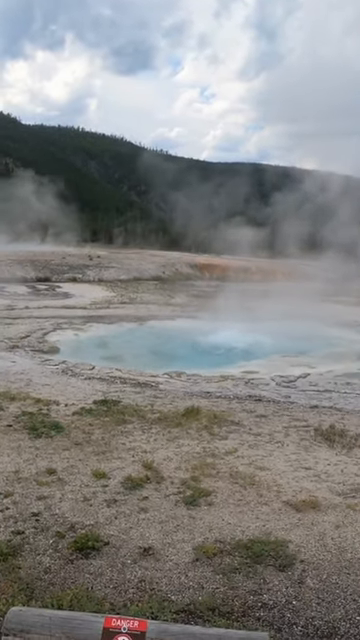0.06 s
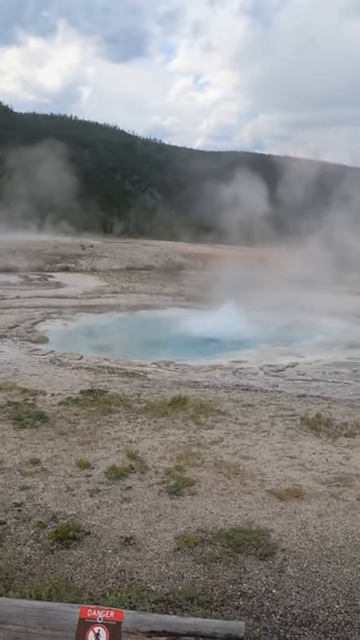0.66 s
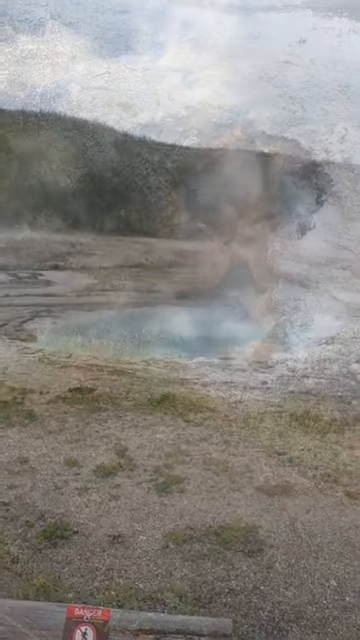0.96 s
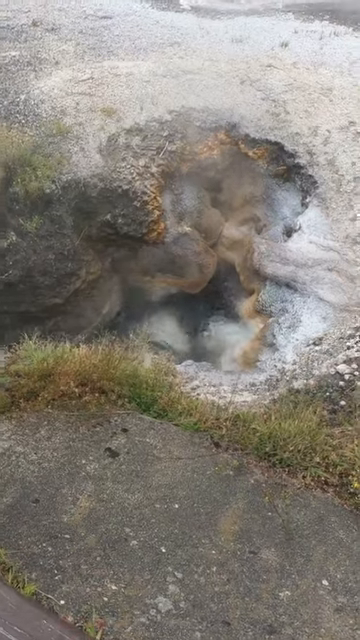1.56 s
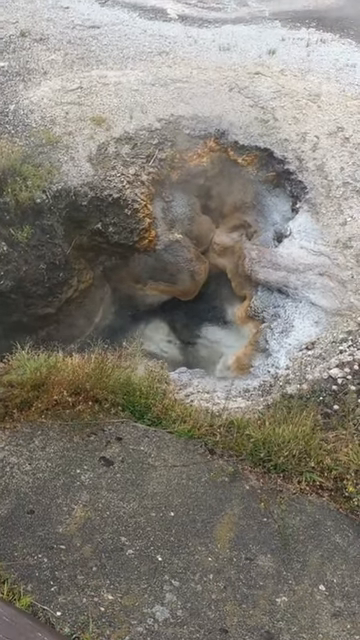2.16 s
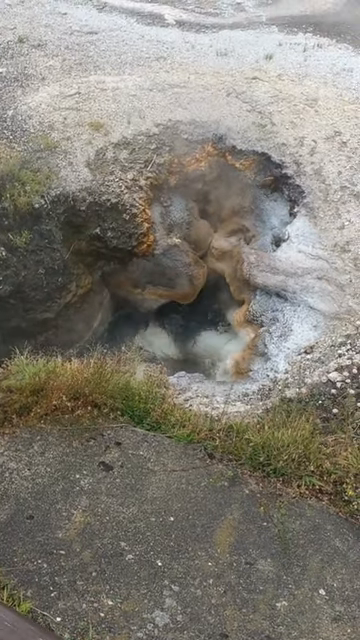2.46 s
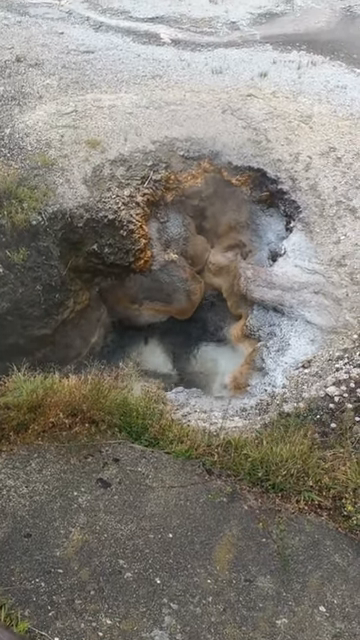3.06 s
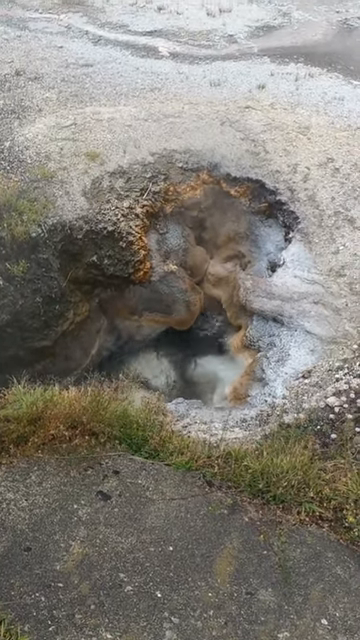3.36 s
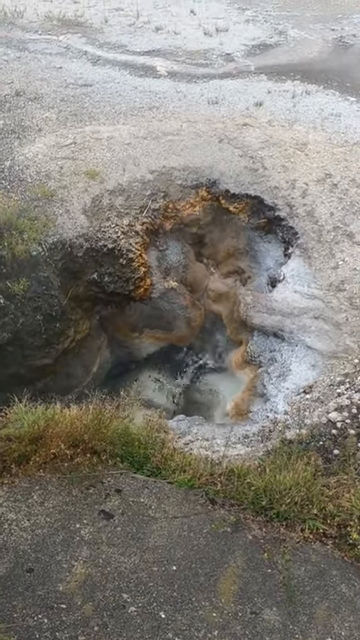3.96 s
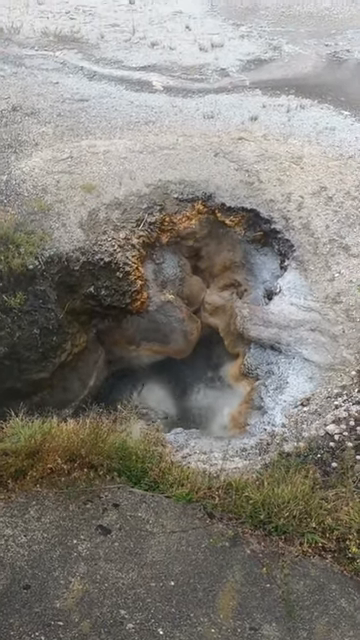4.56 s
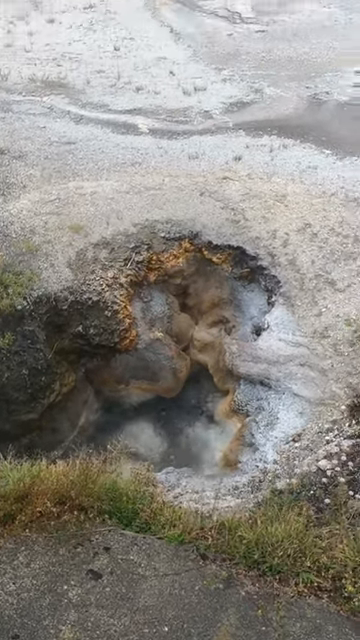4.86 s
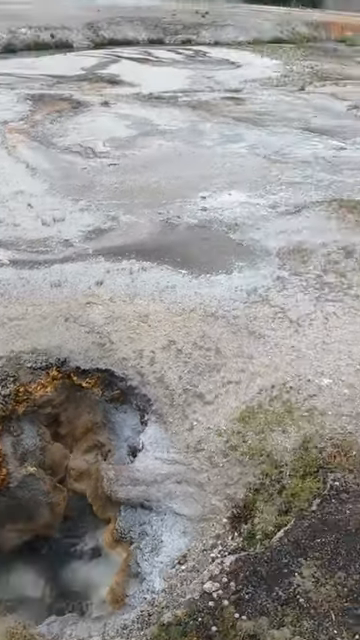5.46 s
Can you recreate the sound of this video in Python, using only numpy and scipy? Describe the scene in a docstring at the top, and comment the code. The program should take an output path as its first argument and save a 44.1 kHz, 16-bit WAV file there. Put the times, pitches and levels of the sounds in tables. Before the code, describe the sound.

A distant boiling pool gives way to a close hot spring bubbling, thumping and spattering on rock, under gusts of wind.

```python
"""A hot spring churns in a small rocky vent close by: large bubbles roll under low gulps and thumps,
small ones ring and snap, and water slops on the rock and throws a fizz of spray and droplets.
A wide pool boiling some way off opens the scene and gives way to the vent. Wind rumbles on the
microphone, a faint low hum lies underneath, and the sound opens from mono to stereo late on."""
import sys
import numpy as np
from scipy import signal
from scipy.fft import rfft, irfft, next_fast_len
from scipy.io import wavfile
from scipy.ndimage import uniform_filter1d

SR = 44100
rng = np.random.default_rng(int(sys.argv[2]) if len(sys.argv) > 2 else 0)


def generate_wav(sig):
    """Save sig (samples, or channels by samples) to the path in sys.argv[1] as 16-bit PCM at SR."""
    pcm = np.round(np.clip(np.atleast_2d(sig).T, -1, 1) * 32767).astype(np.int16)
    wavfile.write(sys.argv[1], SR, pcm)


N = 247401
TIME = np.arange(N) / SR
FFT_SIZE = next_fast_len(N + 8192)
BIN_HZ = np.fft.rfftfreq(FFT_SIZE, 1 / SR)
LEAVE_S, ARRIVE_S = 0.63, 1.45  # the move from the pool to the vent
NEARNESS = np.clip((TIME - LEAVE_S) / (ARRIVE_S - LEAVE_S), 0, 1)

# How hard the vent boils. Each row: time in seconds, level in dB.
BOIL_LEVEL = [(1.2, -38), (1.65, -32), (2.15, -34.5), (3.2, -32.5), (4.15, -32.5), (4.75, -38.5),
              (5.1, -38.5), (5.61, -36.5)]
# The bright tone of flying spray. Each row: frequency in Hz, gain in dB.
SPRAY_SPECTRUM = [(1500, -9), (3200, 7), (4200, 3), (5000, -4), (6200, -5.5), (8000, -14.5), (10500, -22.5),
                  (12500, -22.5), (14500, -44)]
# The opening of the stereo image. Each row: time in seconds, stereo share from 0 to 1.
STEREO_WIDTH = [(3.37, 0), (3.65, 0.16), (4.1, 0.32), (4.4, 0.4)]


def gain_of(db):
    """Decibels to amplitude."""
    return 10 ** (np.asarray(db) / 20)


def unit_rms(x):
    """Scales a sound to rms 1."""
    return x / np.sqrt(np.mean(x ** 2) + 1e-20)


def over_time(rows):
    """Draws a curve through (seconds, value) points, sample by sample."""
    return np.interp(TIME, *np.transpose(rows))


def over_bins(rows):
    """Spreads each column of a spectrum over the FFT bins, on a log frequency scale."""
    hz, *columns = np.transpose(rows)
    return [np.interp(np.log(BIN_HZ + 1), np.log(hz), column) for column in columns]


def filtered(x, response):
    """Applies a frequency response."""
    return irfft(rfft(x, FFT_SIZE) * response, FFT_SIZE)[:N]


def coloured(x, spectrum):
    """Gives a white sound a spectrum, at rms 1."""
    return unit_rms(filtered(x, gain_of(over_bins(spectrum)[0])))


def wander(rate_hz):
    """A smooth random drift of rms 1."""
    return unit_rms(filtered(rng.standard_normal(N), np.exp(-(BIN_HZ / rate_hz) ** 2)))


def hump(middle_s, half_s):
    """A bell-shaped swell that peaks at 1."""
    return np.exp(-0.5 * ((TIME - middle_s) / half_s) ** 2)


def add(mix, start_s, sound):
    """Mixes a sound in at a time."""
    part = mix[max(round(start_s * SR), 0):][:len(sound)]
    part += sound[:len(part)]


def bubble(hz, swell_s, rise):
    """A gas pocket rings and dies, climbing `rise` octaves per swell time as it nears the surface."""
    age = np.arange(int(10 * swell_s * SR) + 2) / (swell_s * SR)
    pitch = hz * 2 ** (rise * (age - 2))
    return age * np.exp(1 - age) * np.sin(2 * np.pi * np.cumsum(pitch) / SR)


def swarm(low_hz, high_hz, per_s, cycles, spread_db, clump_db, wash, pitches=36):
    """Bubbles of many sizes burst in clumps, over a noise wash of those too small to tell apart."""
    out = np.zeros(N)
    for group in np.split(np.geomspace(low_hz, high_hz, pitches), pitches // 6):
        cloud = np.zeros(N)
        for hz in group:
            draw = rng.random(N) * pitches * SR / per_s
            born = draw < 1
            strikes = np.zeros(N)
            strikes[born] = gain_of(-spread_db * np.log(np.maximum(draw[born], 0.02)))
            ring = bubble(hz, cycles * rng.uniform(0.58, 1.27) / hz, rise=rng.uniform(0, 0.093))
            ringing = unit_rms(signal.oaconvolve(strikes, np.diff(ring))[:N])
            cloud += np.sqrt(hz) * ringing  # keeps the swarm white across its band
        out += cloud * gain_of(clump_db * wander(30))  # like sizes come together
    band = (BIN_HZ > low_hz / 2) & (BIN_HZ < high_hz)
    return unit_rms(out) + wash * unit_rms(filtered(rng.standard_normal(N), band))


def rock_echo(x, t60_s):
    """Scattered echoes from the rock walls of the vent."""
    t = np.arange(SR // 4) / SR
    taps = rng.standard_normal(len(t)) * gain_of(-60 * t / t60_s) * (t > 0.003)
    return signal.oaconvolve(x, taps / np.linalg.norm(taps))[:N]


def scattered(x):
    """The same sound by many other paths: its swells stay, its phases are lost."""
    frames = signal.stft(x, nperseg=256, noverlap=192)[2]
    frames = frames * np.exp(2j * np.pi * rng.random(frames.shape))
    return np.std(x) * unit_rms(signal.istft(frames, nperseg=256, noverlap=192)[1][:N])


def microphone_ports(x):
    """As the image opens, each port hears its own colour, delay and share of scattered sound."""
    # Each row: frequency in Hz, left and right gain in dB, left lead in radians, likeness from 0 to 1.
    port_response = [(290, -1, -1.5, 0, 1), (437, -7.5, -4, 0.64, 0.98), (645, -7, -5, 2, 0.3),
                     (950, -1, 4, 1.3, 0.3), (1310, -2, 2.5, 2.5, 0.8), (1880, 6.5, 6.5, 2, 0.3),
                     (2460, 7, 3.5, 1.97, 0.4), (3280, 6, -9.5, 1.27, 0), (4540, 5, -0.5, 2.5, 0.4),
                     (5430, 12, 5, 2.5, 0.6), (6060, 5.5, 11, 1.35, 0.6), (9360, 10.5, 12, 0.2, 0.8),
                     (12400, 2, 1.5, 0.3, 0.6)]
    left_db, right_db, lead, likeness = over_bins(port_response)
    common = filtered(x, np.sqrt((1 + likeness) / 2))
    apart = scattered(filtered(x, np.sqrt((1 - likeness) / 2)))
    left = filtered(common + apart, gain_of(left_db) * np.exp(1j * lead))
    right = filtered(common - apart, gain_of(right_db))
    width = over_time(STEREO_WIDTH)
    return (1 - width) * x + width * np.array([left, right])


def hum(pitch_hz=95.6):
    """A faint low tone fades in and wavers a little."""
    # Each row: time in seconds, level in dB.
    fader = [(1.3, -77), (2.6, -40), (3.9, -43), (4.7, -38.5), (5.6, -40)]
    turns = np.cumsum(pitch_hz + 0.82 * wander(4.8)) / SR
    level = gain_of(over_time(fader) + 0.73 * wander(6.3))
    return level * np.sqrt(2) * np.sin(2 * np.pi * turns)


def wind(breeze_db=-45, vent_boost_db=2.5, lumps_db=3):
    """A breeze and its gusts make lumpy turbulence at the microphone, stronger beside the vent."""
    # The rumble's tone. Each row: frequency in Hz, gain in dB.
    rumble_spectrum = [(12, -15), (24, 13.5), (60, 12.5), (85, 11.5), (130, -6), (300, -61)]
    # Each row: middle in seconds, half length in seconds, level in dB.
    gusts = [(0.037, .035, -35.5), (1.02, 0.03, -37), (1.57, 0.087, -35.5), (1.85, 0.076, -32.5),
             (2.45, 0.13, -37.5), (3.01, 0.06, -33), (3.72, 0.079, -35), (5.0, 0.043, -33)]
    common, apart = (coloured(noise, rumble_spectrum) for noise in rng.standard_normal((2, N)))
    deepest = filtered(apart, 1 / (1 + (BIN_HZ / 45) ** 2))
    side = gain_of(1.5) * over_time(STEREO_WIDTH) * deepest
    force = gain_of(breeze_db + vent_boost_db * NEARNESS)
    for middle_s, half_s, db in gusts:
        force = np.hypot(force, gain_of(db) * hump(middle_s, half_s))
    return np.array([common + side, common - side]) * force * gain_of(lumps_db * wander(6.0))


def far_pool(rush_db=-36.5, heave_db=-45.5):
    """Far boiling blurs to an even rush; the pool heaves once and splashes."""
    # The rush, notched by the echo off the ground. Each row: frequency in Hz, gain in dB.
    rush_spectrum = [(40, -32), (100, -10.5), (180, 0.5), (290, -6.5), (400, -10.5), (600, -20),
                     (810, -14.5), (1100, -18.5), (1370, -26), (1700, -21.5), (1950, -24), (2200, -31.5),
                     (2650, -27), (3100, -33), (3700, -34), (4400, -36), (5100, -42.5), (6200, -45.5),
                     (7400, -50), (15000, -70.5)]
    # The heave's splash. Each row: frequency in Hz, gain in dB.
    heave_spectrum = [(400, -30), (760, 2.5), (1300, -7.5), (3000, -22), (14000, -70)]
    boil = swarm(88.9, 14440, per_s=9000, cycles=1.34, spread_db=1.5, clump_db=2.0, wash=1.0)
    rush = coloured(boil, rush_spectrum) * gain_of(rush_db + wander(6.1))
    heave = coloured(boil[::-1], heave_spectrum) * gain_of(heave_db)
    return rush + heave * hump(middle_s=0.651, half_s=0.045)


def fine_spray(level_db=-73):
    """A high fizz of fine spray swells and fades with the surge near 4 s."""
    fizz = swarm(7500, 13700, per_s=2500, cycles=3.9, spread_db=-2.0, clump_db=-3.0, wash=0.3, pitches=18)
    return fizz * gain_of(level_db) * hump(middle_s=4.02, half_s=0.19)


def plinks(count=280, per_s=45, low_hz=750, high_hz=3650, vent_boost_db=5):
    """Small bubbles ring all over the surface; the smaller, the higher, shorter and fainter."""
    out = np.zeros(N)
    for k, (when, smallness, strength, ring) in enumerate(rng.random((count, 4))):
        octaves = smallness * np.log2(high_hz / low_hz)
        hz = low_hz * 2 ** octaves
        db = -47 + 4 * (2 * strength - 1) - 2.5 * octaves
        swell_s = 2.2 * (0.5 + ring) / hz
        add(out, (k + 2 * when) / per_s, gain_of(db) * bubble(hz, swell_s, rise=0.016))
    boil_db = over_time(BOIL_LEVEL)
    ride_db = 0.15 * (boil_db - boil_db.mean())  # they follow the churning in part
    return out * gain_of(ride_db + vent_boost_db * NEARNESS)


def tick(hz, click_cycles=0.8, ring_cycles=4):
    """A droplet lands: a sharp click, and the brief ring of the tiny bubble that it traps."""
    sound = 0.31 * bubble(hz, ring_cycles / hz, rise=0.022)
    add(sound, 0, bubble(hz, click_cycles / hz, rise=0))
    return sound


def droplets(count=420, per_s=85, low_hz=2970, high_hz=10540):
    """Thrown droplets patter back, a few large ones clear above the rest; the rock scatters each tick."""
    # Each row: start in seconds, level in dB, pitch in Hz.
    large_drops = [(2.410, -45, 6300), (2.984, -36, 4500), (3.474, -35, 6160), (3.474, -35, 3660),
                   (3.877, -31, 3500), (4.263, -46, 5800), (4.278, -52, 10000), (4.293, -45, 5600),
                   (4.353, -37, 3640), (4.355, -51, 7000), (4.432, -38.5, 3500), (4.593, -38, 3600),
                   (4.659, -36.5, 3600), (4.662, -52, 8000), (4.686, -39, 3300), (4.747, -52, 7500),
                   (4.826, -45, 4200), (4.855, -41, 3300), (4.857, -41.5, 5860), (5.088, -48, 5500),
                   (5.462, -39, 3350)]
    out = np.zeros(N)
    for start_s, db, hz in large_drops:
        add(out, start_s, gain_of(db) * tick(hz))
    for k, (when, smallness, strength) in enumerate(rng.random((count, 3))):
        octaves = smallness * np.log2(high_hz / low_hz)
        db = -51.5 + 8.5 * strength ** 2 - 8.5 * octaves
        add(out, ARRIVE_S + (k + 3 * when) / per_s, gain_of(db) * tick(low_hz * 2 ** octaves))
    return out + gain_of(-5) * rock_echo(out, t60_s=0.06)


def surface(calm_slosh_db=-49, calm_spray_db=-58, rise_s=0.15):
    """Sloshing water traps small bubbles and its spray crackles back; both swell with each surge."""
    # The water heaves up. Each row: start, hold and sinking time in seconds, slosh and spray in dB.
    surges = [(1.36, 0.28, 0.71, -45, -55), (2.58, 0.68, 1, -50, -61.5), (3.66, 0.31, .08, -44.5, -49.5),
              (5.33, 0.052, 0.16, -44.5, -49.5)]
    # The slosh's tone. Each row: frequency in Hz, gain in dB.
    slosh_spectrum = [(250, 0.5), (500, -1), (700, -2), (880, -5.5), (1100, 1.5), (1400, 0), (1850, -1.5),
                      (2150, -5.5), (2700, -6.5), (3200, -15), (4200, -17), (6000, -25.5), (9000, -43)]
    slosh_gain, spray_gain = gain_of(calm_slosh_db), gain_of(calm_spray_db)
    for start_s, hold_s, sink_s, slosh_db, spray_db in surges:
        height = np.interp(TIME, start_s + np.cumsum([0, rise_s, hold_s, sink_s]), [0, 1, 1, 0])
        slosh_gain = np.hypot(slosh_gain, height * gain_of(slosh_db))
        spray_gain = np.hypot(spray_gain, height * gain_of(spray_db))
    ripple = wander(25)
    slosh = swarm(401.5, 5870, per_s=1500, cycles=3.02, spread_db=-0.5, clump_db=0.0, wash=1.0)
    spray = swarm(2520, 15100, per_s=2200, cycles=3.4, spread_db=-1.0, clump_db=0.3, wash=1.0)
    return (coloured(slosh, slosh_spectrum) * slosh_gain * gain_of(0.6 * ripple)
            + coloured(spray, SPRAY_SPECTRUM) * spray_gain * gain_of(0.9 * ripple))


def spatter(count=60, per_s=12, slap_db=-52, drops_db=-62.5, spread_db=2.5, swell_s=0.004):
    """Small slaps at uneven intervals beside the vent, as extra rows for splashes()."""
    when, slap, drops = rng.uniform(-0.98, 1, (count, 3)).T
    times = ARRIVE_S + (np.arange(count) + 0.75 * when) / per_s
    return list(zip(times, slap_db + spread_db * slap, drops_db + spread_db * drops, [swell_s] * count))


def splashes():
    """Water slaps the rock in a burst of small bubbles and droplets; a thinner shower follows."""
    # Each row: time in seconds, slap level in dB, droplet level in dB, swell time in seconds.
    slaps = [(1.400, -41, -54.5, 0.0078), (1.55, -55, -52.5, 0.026), (1.623, -45, -53, 0.0083),
             (1.68, -40, -52, 0.016), (1.717, -37, -62, 0.0045), (1.78, -41, -61, 0.017),
             (1.945, -40, -58, 0.015), (2.349, -43.5, -64, 0.0087), (2.89, -36, -67, 0.014),
             (2.968, -41, -54, 0.021), (3.205, -45, -58, 0.02), (3.35, -44, -59, 0.027),
             (3.467, -42, -53, 0.006), (3.5, -58, -55, 0.029), (3.567, -35.5, -47.5, 0.013),
             (3.602, -35.5, -51.5, .01), (3.776, -33, -58, .014), (3.835, -42, -59, 0.013),
             (4.098, -41, -50, 0.015), (4.125, -38, -55, 0.02), (4.262, -55, -50, 0.0054),
             (4.284, -43, -55, 0.0063), (4.352, -50, -53, .002), (4.578, -42, -62, .007),
             (4.659, -51, -55, 0.0024), (4.822, -45, -59, .006), (5.026, -37, -61, 0.017),
             (5.084, -42, -55, 0.0084), (5.19, -46, -49.5, 0.0065), (5.206, -49, -57, 0.0079),
             (5.3, -44, -66, .02), (5.42, -42.5, -70, 0.016), (5.508, -33, -48.5, 0.0072),
             (5.555, -48, -53, 0.0037)]
    # The body of a slap. Each row: frequency in Hz, gain in dB.
    slap_spectrum = [(150, -6), (380, 17.5), (600, 5.5), (1000, 1), (1800, -1.5), (2300, -10.5),
                     (3300, -13.5), (4500, -41), (8000, -57)]
    slap_gain, drops_gain = np.zeros((2, N))
    t = np.arange(SR // 8) / SR
    for time_s, slap_db, drops_db, swell_s in list(slaps) + spatter():
        age = t / swell_s
        burst = np.exp(-(age - 2) ** 2)
        shower = 0.3 * (age / 4) ** 2 * np.exp(2 - age / 2)
        add(slap_gain, time_s - swell_s, gain_of(slap_db) * (burst + shower))
        add(drops_gain, time_s - swell_s, gain_of(drops_db) * (burst + shower))
    grains = swarm(297.2, 14650, per_s=11000, cycles=2.1, spread_db=1.0, clump_db=1.5, wash=0.34,
                   pitches=24)
    return slap_gain * coloured(grains, slap_spectrum) + drops_gain * coloured(grains, SPRAY_SPECTRUM)


def plips_and_snaps():
    """Single small bubbles ring clear, and bubble skins snap."""
    # Each row: start in seconds, peak in dB, pitch in Hz, swell time in seconds.
    plips = [(0.307, -37, 1150, 0.0017), (1.624, -40, 2720, 0.0019), (1.627, -34, 1860, .002),
             (1.727, -37.5, 3030, 0.0018), (1.946, -42, 2720, 0.0012), (2.313, -34, 784, 0.0024),
             (2.326, -33.5, 954, 0.0019), (3.478, -47, 3250, 0.0056), (3.568, -40, 3350, .003),
             (3.6, -34, 3380, .0013), (3.611, -31, 3260, 0.0013), (3.611, -32, 1356, 0.0015),
             (3.62, -36.5, 2320, 0.0016), (3.786, -37.5, 1710, 0.0048), (3.85, -36.5, 1610, .002),
             (4.105, -38, 3300, .003), (4.432, -36.5, 1300, .0014), (4.606, -34.5, 1290, .0016),
             (4.66, -41, 1280, .0016), (4.725, -41, 1980, 0.0018), (5.034, -40, 1720, 0.0019),
             (5.057, -36, 840, 0.004), (5.079, -33.5, 1006, 0.0026), (5.128, -34, 936, 0.0029),
             (5.138, -40, 1750, .0012), (5.256, -37.5, 900, 0.0028), (5.425, -36, 1590, 0.0021),
             (5.439, -31, 2460, 0.0011), (5.542, -38, 2410, .0016)]
    # Each row: start in seconds, peak in dB, pitch in Hz.
    snaps = [(2.356, -28, 1380), (2.893, -35, 1600), (4.4005, -24.5, 1730), (4.4025, -25, 1440),
             (4.406, -29, 1700), (5.0857, -26.5, 1250), (5.51, -23.5, 1900), (5.558, -31, 2000)]
    out = np.zeros(N)
    for start_s, db, hz, swell_s in plips:
        add(out, start_s, gain_of(db) * bubble(hz, swell_s, rise=0.018))
    for start_s, db, hz in snaps:
        add(out, start_s, gain_of(db) * bubble(hz, swell_s=0.00026, rise=0))
    return out


def churn():
    """A crowd of large bubbles rolls in the throat of the vent."""
    # The deep tone of the boil. Each row: frequency in Hz, gain in dB.
    churn_spectrum = [(40, -11), (75, -0.5), (120, 0), (190, -2), (270, -4), (380, -5.5), (470, -12),
                      (600, -15.5), (800, -21), (1300, -55)]
    boil = swarm(92.8, 922, per_s=1300, cycles=0.8, spread_db=2.0, clump_db=2.5, wash=0.54)
    return coloured(boil, churn_spectrum) * gain_of(over_time(BOIL_LEVEL))


def gurgle(gulp_power, relative_db=-9.5):
    """Water stirred up by the gulps: a low noise that follows their loudness."""
    # Each row: frequency in Hz, gain in dB.
    gurgle_spectrum = [(60, -24), (130, 0.5), (230, 0), (380, -5.5), (520, -20.5), (1000, -21), (2500, -82)]
    stir = np.sqrt(abs(uniform_filter1d(gulp_power, size=700)))
    return gain_of(relative_db) * stir * coloured(rng.standard_normal(N), gurgle_spectrum)


def gulps(wobble=0.2, trim_db=-1.7):
    """Low gulps and thumps: short, round, gliding notes, alone or in quick chains."""
    # Each row: loudest moment in seconds, level in dB before the trim, pitch in Hz,
    # swell time in seconds, glide in octaves per second.
    gulps_and_thumps = [(.066, -24.5, 195, .016, 1.5), (.535, -27.5, 195.1, 0.02, -0.5),
                        (.715, -29, 203, .012, -8), (1.021, -20, 124.6, 0.007, -50),
                        (1.412, -21, 187, 0.01115, 20.5), (1.522, -25, 100, .01, -1.5),
                        (1.588, -18.5, 168, 0.0038, -18), (1.72, -28, 349, .022, 1),
                        (2.271, -19.5, 139, .007, 15), (2.290, -16, 193.4, .014, 10.5),
                        (2.332, -22, 264.4, 0.013, 5.5), (2.362, -12.5, 160, .008, 0.5),
                        (2.364, -16.5, 319, .004, -9), (2.453, -23, 312, 0.0096, -1.5),
                        (2.887, -23.5, 196.3, .014, 18.5), (3.015, -15, 127, 0.0069, 18),
                        (3.033, -15, 142.7, 0.0111, -0.5), (3.062, -13, 176.3, 0.00784, 23.5),
                        (3.077, -21.5, 166, 0.00785, 21), (3.151, -24, 171.7, .014, -9),
                        (3.637, -13, 124, 0.00584, -14), (3.665, -18, 117, .014, 18.5),
                        (3.7, -23, 82, .025, 0), (3.685, -15.5, 115, 0.00875, 16),
                        (3.712, -14, 132, 0.00796, 27), (3.737, -18, 151, 0.00897, 20),
                        (3.752, -14, 134, 0.0072, 5), (3.792, -19.5, 370.5, 0.016, 17),
                        (3.8, -14.5, 180, 0.0076, -9), (4.582, -23, 178, 0.0061, 1),
                        (5.024, -19.5, 148, 0.01015, -11), (5.053, -23.5, 178.7, 0.017, 1),
                        (5.055, -30, 255, .012, 4.5), (5.116, -27.5, 192, 0.00914, 8),
                        (5.225, -24.5, 106, .008, 2), (5.264, -25.5, 305, 0.0061, -2)]
    notes, power = np.zeros((2, N))
    for peak_s, db, hz, swell_s, glide in gulps_and_thumps:
        t = np.arange(-3 * swell_s, 3 * swell_s, 1 / SR)
        turns = np.cumsum(hz * 2 ** (glide * t)) / SR
        note = gain_of(db) * np.exp(-(t / swell_s) ** 2) * np.sin(2 * np.pi * turns)
        add(notes, peak_s - 3 * swell_s, note)
        add(power, peak_s - 3 * swell_s, note ** 2)
    return gurgle(power) + notes * (1 + wobble * np.tanh(wander(200))) * gain_of(trim_db)


def throat(echo_db=-12):
    """Gulps, thumps, plips and snaps, with the answer of the vent's rock walls."""
    direct = gulps() + plips_and_snaps()
    return direct + gain_of(echo_db) * rock_echo(direct, t60_s=0.34)


def scene():
    """The pool crossfades into the vent; single bubbles and wind sound throughout."""
    vent = churn() + NEARNESS * surface() + fine_spray() + hum()
    bed = np.sqrt(1 - NEARNESS) * far_pool() + np.sqrt(NEARNESS) * vent
    water = bed + plinks() + throat() + splashes() + droplets()
    return microphone_ports(water) + wind()


def record(dry):
    """A steep low-pass takes off the highest treble."""
    low_pass = signal.firwin(511, cutoff=14700, window=("kaiser", 9), fs=SR)
    return signal.oaconvolve(dry, low_pass[None], "same")


dry = scene()
out = record(dry)
generate_wav(out)
```